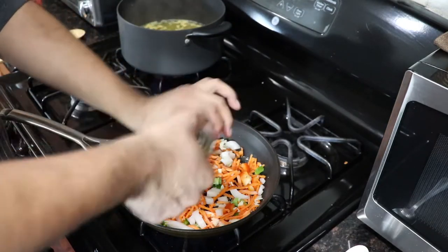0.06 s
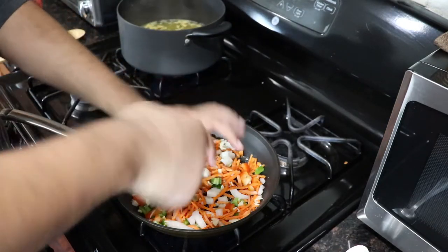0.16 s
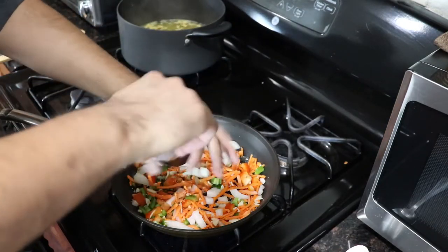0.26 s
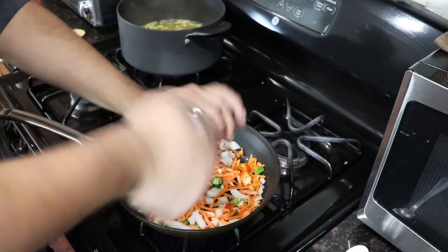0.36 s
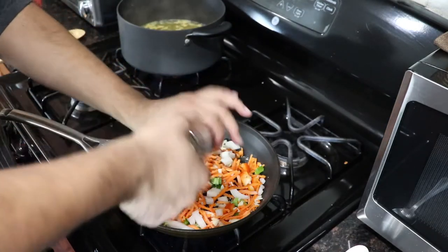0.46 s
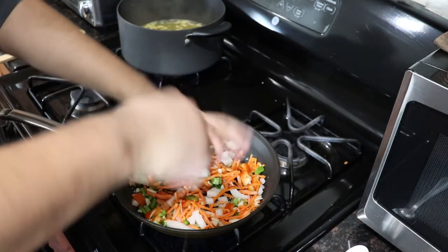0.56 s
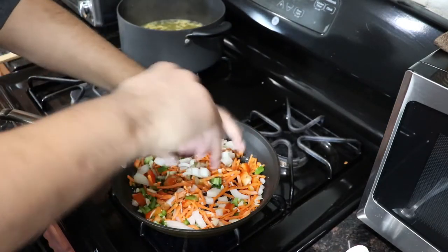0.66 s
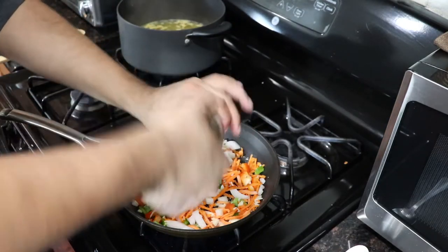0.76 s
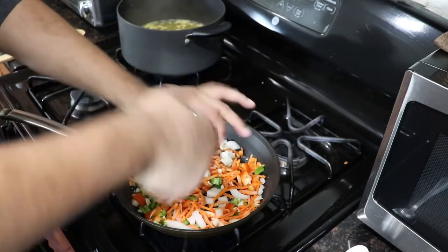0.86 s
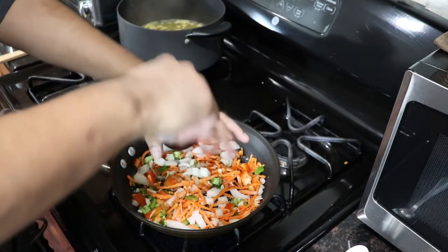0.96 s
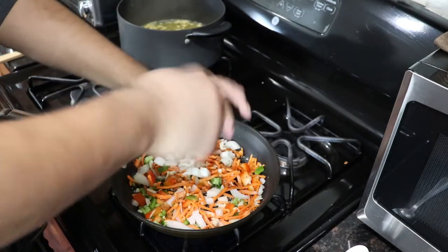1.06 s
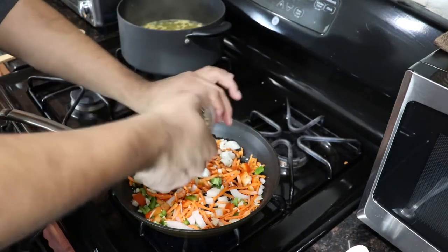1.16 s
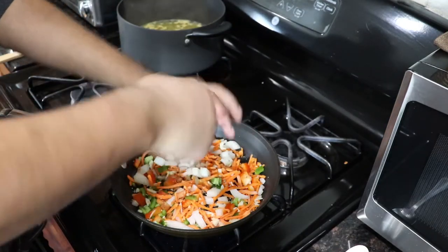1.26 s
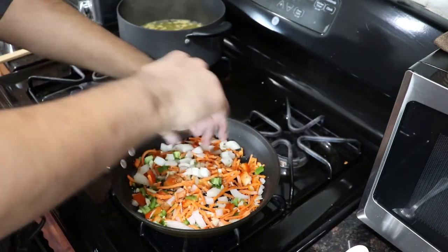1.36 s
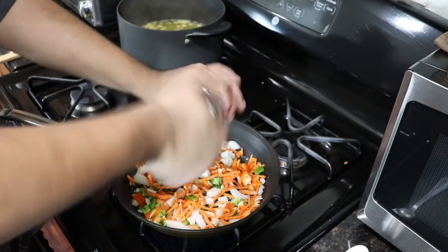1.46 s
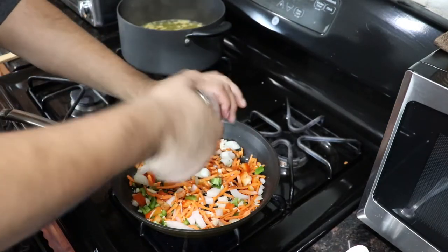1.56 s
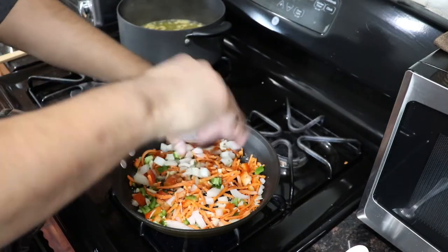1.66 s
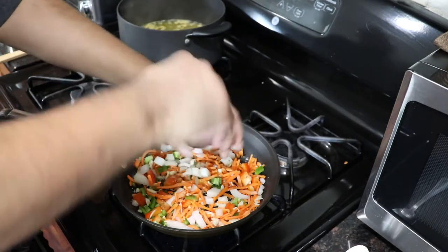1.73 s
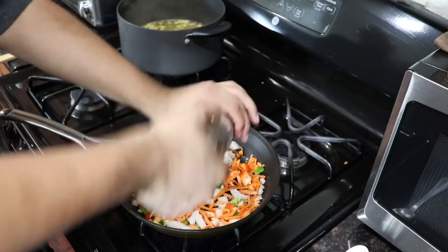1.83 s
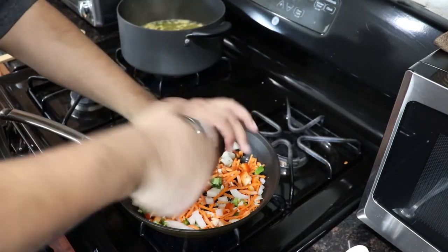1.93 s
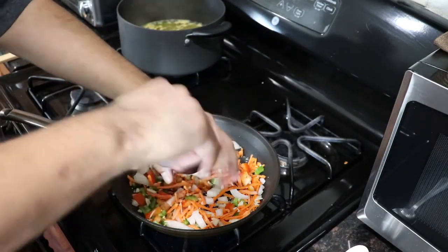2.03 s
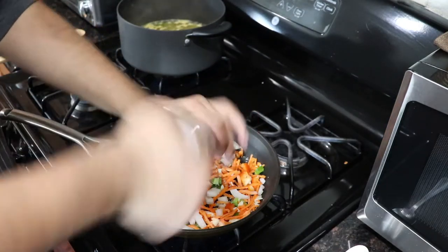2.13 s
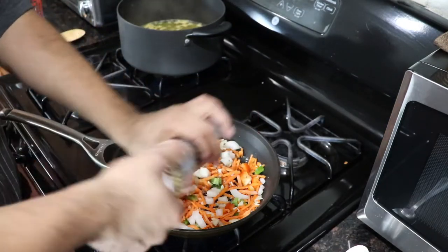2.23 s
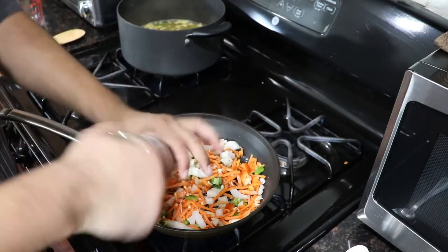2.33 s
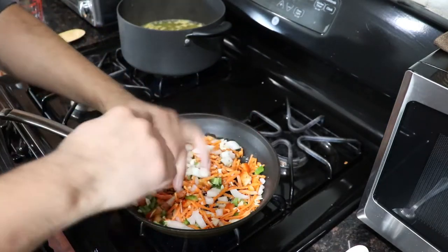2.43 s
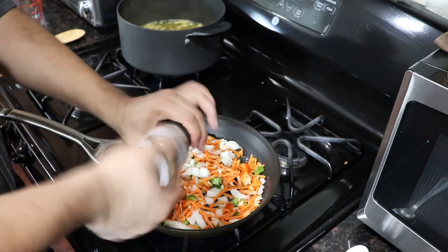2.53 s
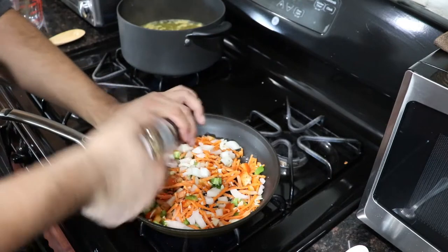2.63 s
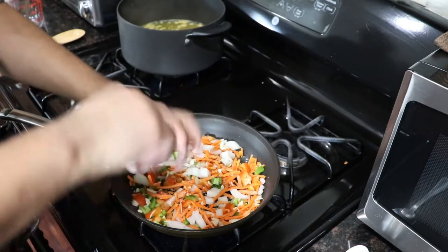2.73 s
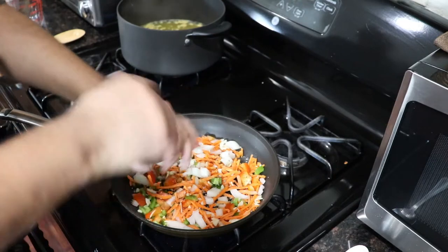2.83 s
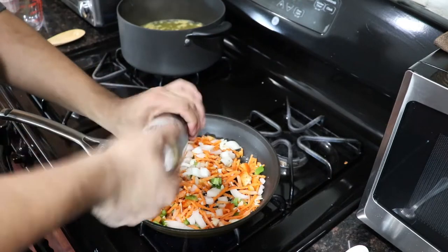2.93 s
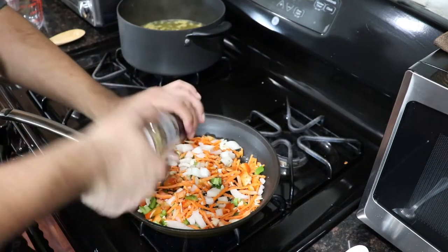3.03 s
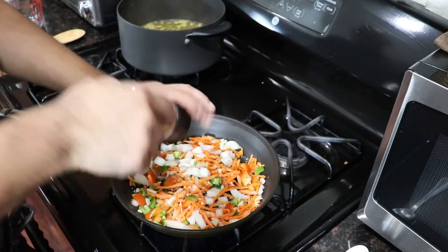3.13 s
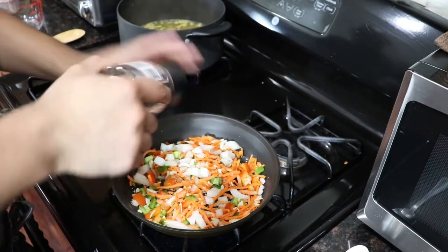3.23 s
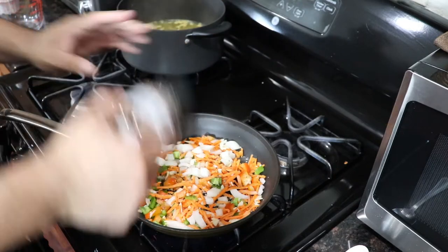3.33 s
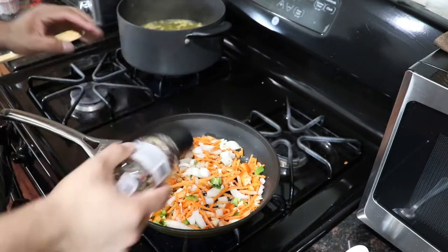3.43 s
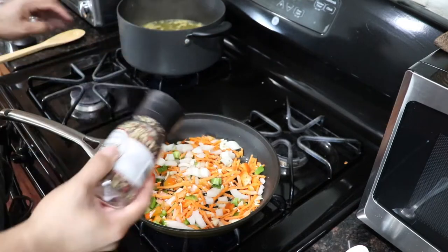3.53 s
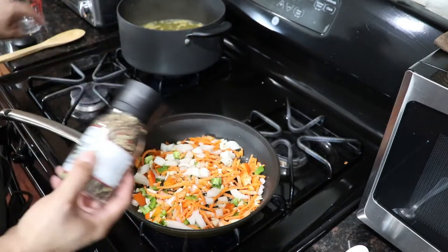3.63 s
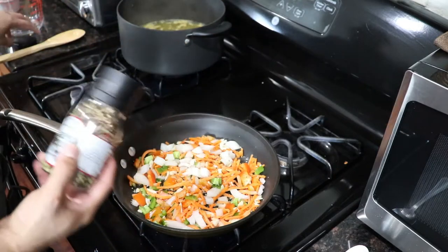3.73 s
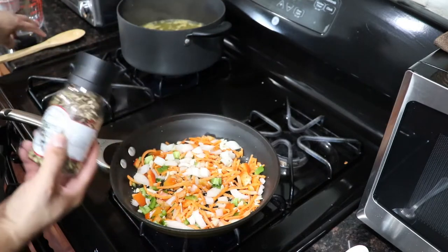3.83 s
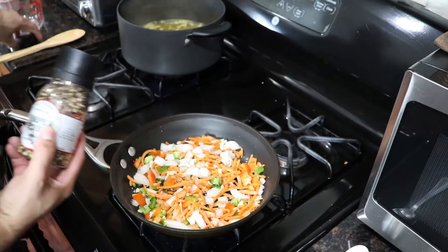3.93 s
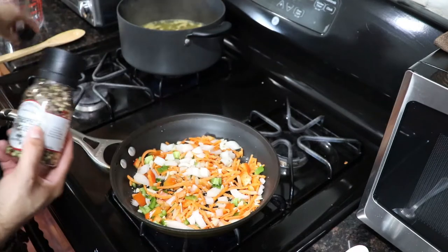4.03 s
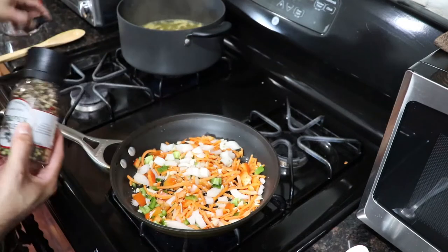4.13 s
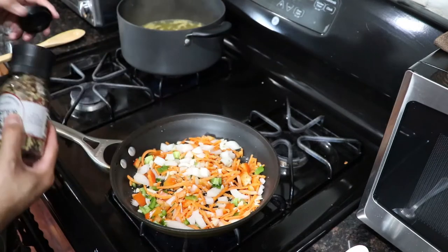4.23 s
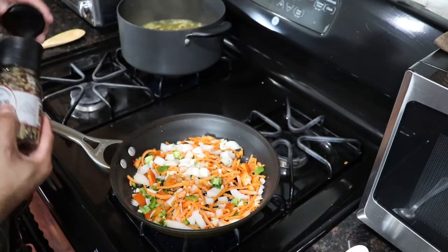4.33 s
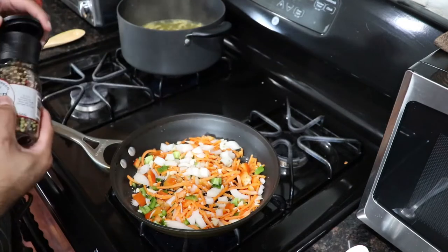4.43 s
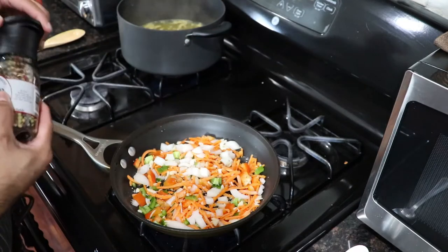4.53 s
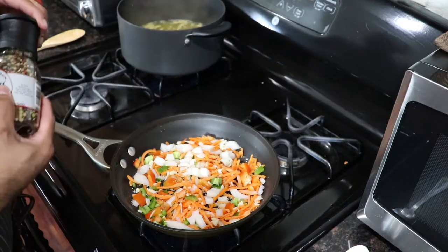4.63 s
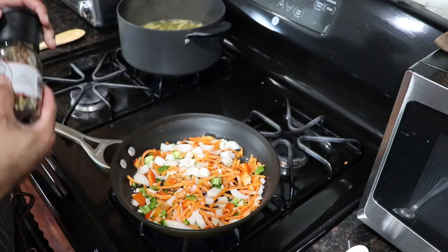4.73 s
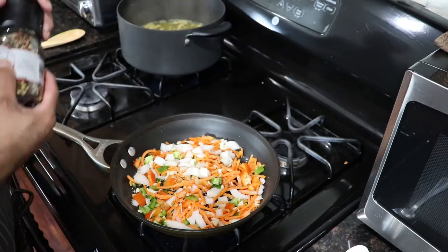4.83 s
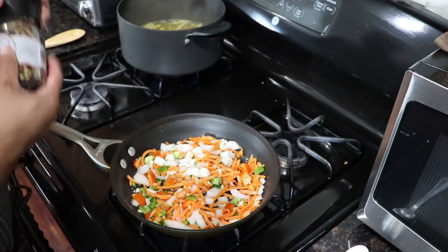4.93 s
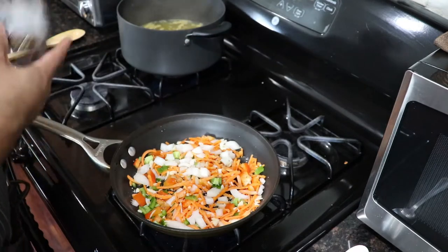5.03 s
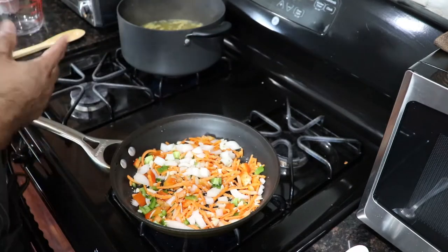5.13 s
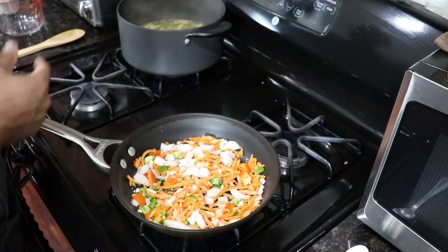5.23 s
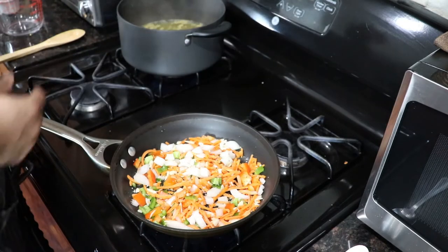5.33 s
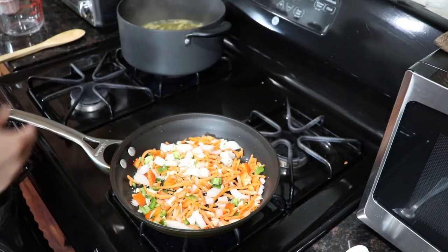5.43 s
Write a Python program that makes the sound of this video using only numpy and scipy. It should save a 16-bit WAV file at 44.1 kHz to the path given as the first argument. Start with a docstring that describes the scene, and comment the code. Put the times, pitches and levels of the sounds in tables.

```python
"""Pepper mill over a sizzling pan

A mill is twisted back and forth: the burr crunches, peppercorns crack, skin rubs on the cap. The mill is
then tipped upright and carried off; knocks on the counter and a brief jar chatter follow.
Crunch, rub, sizzle and patter are filtered random grains; cracks and knocks are decaying noise bursts.
Flame noise and hum lie underneath. One close microphone: gain control ducks everything on loud treble.
"""
import sys
import numpy as np
from scipy import signal
from scipy.fft import rfft, irfft
from scipy.io import wavfile
from scipy.ndimage import uniform_filter1d, minimum_filter1d

SR = 44100
rng = np.random.default_rng(int(sys.argv[2]) if len(sys.argv) > 2 else 0)


def dump(signal):
    """Clip the signal to [-1, 1] and save it as 16-bit WAV at the path in sys.argv[1]."""
    limited = np.clip(np.atleast_2d(signal).T, -1, 1)
    pcm = np.round(limited * 32767).astype(np.int16)
    wavfile.write(sys.argv[1], SR, pcm)


N = 242064

# All levels in dB are relative. Broad spectra are scaled to unit power gain when used.
# Pan, broad spectrum. Each row: frequency in Hz, level in dB.
PAN_SPECTRUM = [(240, -35.5), (400, -11.5), (459, -9), (543, -5.5), (633, -9), (847, -6.5), (1070, -7),
                (1540, -4), (1660, -4.5), (1760, -6), (3250, -4), (3740, -5), (5910, -7), (15500, -24.5)]
# Pan, peaks and a dip. Each row: centre in Hz, width in Hz, height in dB.
PAN_MODES = [(1910, 300, 4), (2920, 230, 2), (7700, 2700, 5.5), (10340, 650, -0.5), (12400, 1800, 7.5)]
# Gas flame, broad spectrum. Each row: frequency in Hz, level in dB.
FLAME_SPECTRUM = [(20, -26), (30, 6), (42, 3), (52, 0), (100, -1.5), (170, -1), (290, 3), (420, -3),
                  (700, -18.5), (2000, -15.5)]
# Hum of stove and kitchen appliances. Each row: frequency in Hz, rms level in dB.
HUM_TONES = [(41, -72), (120, -57.5), (326, -51.5), (603, -53)]
# Skin slides over the mill for a new grip or to let go.
# Each row: start in seconds, rise in seconds, hold in seconds, level in dB, sharpness in dB.
SLIDES = [(0.0, 0.0036, .02, -20, -1), (0.194, 0.17, 0.021, -21, -2), (0.71, 0.033, 0.014, -20.5, 0),
          (1.086, 0.014, .02, -21.5, 0), (1.44, .03, .02, -25, 5.5), (2.149, .012, 0.016, -20.5, -6),
          (2.747, .035, 0.013, -18, -4), (3.194, 0.015, .008, -20.5, 4), (3.446, .025, 0.01, -9.5, -2),
          (3.735, 0.024, .01, -23.5, 3), (5.102, .022, 0.046, -21, 2)]
# Skin on the cap, broad spectrum. Each row: frequency in Hz, level in dB.
SKIN_SPECTRUM = [(100, -33), (300, -26), (800, -19.5), (2000, -7.5), (4000, 2), (5000, -4.5), (6200, 2.5),
                 (7600, 3), (9700, -8.5), (12500, -19), (16000, -32)]
# Working twists of the cap, nearly three a second.
# Each row: start in seconds, rise in seconds, hold in seconds, crunch in dB, rub in dB, rub sharpness in dB.
TWISTS = [(0.039, 0.044, 0.04, -11.5, -20, -8), (0.386, 0.062, 0.024, -12, -19.5, 0),
          (0.765, 0.037, 0.039, -13, -17.5, 2.5), (1.123, 0.052, 0.023, -7.5, -18.5, 6),
          (1.475, 0.044, 0.053, -13, -19, 0), (1.819, 0.058, .015, -13, -16.5, -9),
          (2.169, 0.028, 0.059, -14.5, -19.5, -4), (2.548, 0.062, 0.017, -14, -13, 0),
          (2.909, 0.069, 0.033, -14, -16, 3)]
# Lighter turns back between the twists.
# Each row: start in seconds, rise in seconds, hold in seconds, crunch in dB, rub in dB, rub sharpness in dB.
BACK_TURNS = [(0.607, 0.039, 0.026, -26, -20, -9), (0.958, 0.03, 0.014, -25.5, -22, -4),
              (1.314, 0.022, 0.036, -23.5, -26.5, -2), (1.67, 0.034, .04, -29.5, -26.5, -3),
              (2.031, 0.016, 0.014, -23, -23, -13), (2.4, .04, 0.033, -29, -19.5, 0.5),
              (2.734, 0.084, 0.034, -20, -23.5, -2), (3.144, .008, 0.0074, -30.5, -40, 1)]
# Whole peppercorns breaking in the burr.
# Each row: start in seconds, level in dB, treble gain in dB, t60 in seconds.
CRACKS = [(0.05, -14.5, 17, 0.0089), (0.064, -11, 5, 0.034), (0.1, 5.5, 4.5, 0.012), (0.145, 0.5, 7, 0.013),
          (0.451, -1, 7.5, 0.015), (0.4703, -2, 1, 0.018), (0.4878, -12.5, 23.5, 0.008),
          (0.6071, -8, -20, 0.035), (0.6306, -2, 2.5, 0.013), (0.7976, -4, -0.5, 0.021),
          (0.804, -9, -4, 0.017), (0.8785, -19, 18.5, 0.012), (1.029, -28, 16, 0.0095),
          (1.1557, -1, 16.5, 0.041), (1.195, 5, -2.0, 0.019), (1.207, 10, -1, 0.0095),
          (1.3569, -10.5, 8.5, 0.011), (1.5006, -11, -14, 0.014), (1.5242, 10, -2.5, 0.0085),
          (1.5505, -6, -10, 0.02), (1.568, -1, 10, 0.0085), (1.8497, -4.5, 3, 0.017),
          (1.8562, -3.5, 4, 0.041), (1.8763, -1.5, -7, 0.029), (1.8808, 0, 9.5, 0.026),
          (1.953, -16.5, 25, 0.0092), (2.0424, -12.5, -22, 0.041), (2.1943, 0, 5.5, 0.048),
          (2.2204, 3, -8, 0.028), (2.259, 1, 7.5, 0.02), (2.2693, 0.5, 18, 0.0063), (2.617, 7, -4, 0.028),
          (2.7965, -15.5, 11.5, 0.018), (2.829, -3.5, -15, 0.022), (2.8317, 0, -0.5, 0.016),
          (2.937, -10.5, 1, 0.022), (2.974, -2.5, 6, 0.0083), (2.9942, 3, 4, 0.013), (3.157, -16, 0, 0.036)]
# Mill body, broad spectrum. Each row: frequency in Hz, level in dB.
MILL_SPECTRUM = [(60, -35), (150, -40), (240, -7.5), (450, -12), (750, -12), (950, -1.5), (1400, -4.5),
                 (2600, -4.5), (4200, -7), (5200, -7), (7800, -6), (9500, -17.5), (13000, -17),
                 (16000, -59)]
# Resonances of cap and jar before detuning. Each row: centre in Hz, width in Hz, height in dB.
MILL_MODES = [(284, 250, 5.5), (1065, 127, 9.5), (1809, 200, 9.5), (2730, 1060, 5), (3200, 460, 4.5),
              (4084, 420, 6), (7200, 670, 6)]
# Loosened grit, broad spectrum. Each row: frequency in Hz, level in dB.
GRIT_SPECTRUM = [(900, -38), (2400, -15), (3000, -1), (3800, -1), (4500, -8), (8000, -18), (12000, -56)]
# Peppercorns tumble as the jar is tipped, then stood upright.
# Each row: start in seconds, rise in seconds, hold in seconds, level in dB.
TUMBLES = [(3.36, 0.083, 0.034, -21.5), (3.693, .065, 0.035, -25)]
# Jar wall, broad spectrum. Each row: frequency in Hz, level in dB.
WALL_SPECTRUM = [(200, -23), (750, -11), (1100, 0.5), (1900, 1.5), (3500, -2.5), (7500, 3.5), (14000, -30)]
# Jar resonances around loose peppercorns.
# Each row: centre in Hz, width in Hz, height tipped in dB, height upright in dB.
JAR_MODES = [(1090, 140, 17, 0), (1380, 140, 3, 6.5), (1730, 220, 9.5, 12), (2960, 500, 11, 8)]
# Dull knocks, first in the mill, later on the counter.
# Each row: start in seconds, level in dB, lowest in Hz, highest in Hz, t60 in seconds.
KNOCKS = [(1.1579, -16.5, 45, 195, 0.026), (4.493, -27.5, 700, 1600, 0.023),
          (4.5248, -16.5, 690, 1850, 0.02), (4.605, -21.5, 280, 2000, 0.04), (4.652, -21, 280, 1700, 0.016),
          (4.692, -15.5, 452, 2080, 0.03), (4.839, -22.5, 400, 1140, 0.018),
          (4.8797, -13.5, 130, 1550, 0.021), (4.887, -17.5, 170, 1500, 0.02)]
# A jar chatters against its neighbour.
# Each row: start in seconds, rise in seconds, hold in seconds, level in dB.
CLINKS = [(4.59, 0.0085, 0.012, -24)]
# Chattering jar, broad spectrum. Each row: frequency in Hz, level in dB.
CLINK_SPECTRUM = [(500, -18), (1800, 0), (3500, -13), (7000, -12), (14000, -22)]
# Chattering jar, resonances. Each row: centre in Hz, width in Hz, height in dB.
CLINK_MODES = [(1820, 180, 9), (2200, 200, 9), (2630, 320, 11), (4960, 200, 22)]

# Fall of each movement after its hold
TWIST_RELEASE_DB_PER_S, BACK_RELEASE_DB_PER_S = 182, 167
RUB_RELEASE_DB_PER_S, SLIDE_RELEASE_DB_PER_S, TUMBLE_RELEASE_DB_PER_S = 223, 217, 196
RUB_LAG_S = 0.027  # in a working twist the rub follows the bite of the burr


def from_db(db):
    """Decibels to amplitude gain."""
    return 10 ** (np.asarray(db) / 20)


def rms_one(x):
    """Scale to unit power."""
    return x / np.sqrt(np.mean(x ** 2) + 1e-20)


def drift(rate_hz):
    """Slow random signal of unit power: low-passed noise made at SR / 40, then interpolated."""
    r = np.exp(-80 * np.pi * rate_hz / SR)
    noise = rng.standard_normal(N // 40 + 2002)
    slow = signal.lfilter([1], [1, -2 * r, r * r], noise)[2000:]  # drop the start-up
    return np.interp(np.arange(N) / 40, np.arange(len(slow)), rms_one(slow))


def butter(x, hz, kind, order=2):
    """Causal Butterworth filter."""
    sos = signal.butter(order, np.clip(hz, 10, .45 * SR), kind, fs=SR, output="sos")
    return signal.sosfilt(sos, x)


def colour(x, spectrum, modes=(), size=8192):
    """Pass x through a causal body of unit power gain: a broad spectrum plus resonances."""
    hz = np.maximum(np.fft.rfftfreq(size, 1 / SR), 1)
    points_hz, points_db = np.transpose(spectrum)
    level_db = np.interp(np.log(hz), np.log(points_hz), points_db)
    for centre_hz, width_hz, height_db in modes:
        level_db = level_db + height_db / (1 + (2 * (hz - centre_hz) / width_hz) ** 2)
    # minimum phase by folding the cepstrum: nothing rings before the blow
    cepstrum = irfft(np.log(from_db(level_db)))
    cepstrum[1:size // 2] *= 2
    cepstrum[size // 2 + 1:] = 0
    response = irfft(np.exp(rfft(cepstrum)))
    return signal.fftconvolve(x, response / np.linalg.norm(response))[:N]


def grains(per_s, spread_db):
    """Random clicks of uneven size and sign, unit power."""
    sizes = from_db(spread_db * np.minimum(rng.exponential(1, N), 4))
    signed = sizes * rng.choice([-1, 1], N)
    return rms_one(signed * (rng.random(N) < per_s / SR))


def burst(t60_s, size=4096):
    """Noise that starts at unit power and decays exponentially."""
    decay = from_db(-60 * np.arange(size) / (SR * max(t60_s, .002)))
    return rng.standard_normal(size) * decay


def add(track, start_s, sound):
    """Mix a sound into the track."""
    at = max(round(start_s * SR), 0)
    track[at:at + len(sound)] += sound[:N - at]


def swell(start_s, rise_s, hold_s, release_db_per_s):
    """Strength of one movement: a linear rise, a hold, a steady fall in dB."""
    t = np.arange(N) / SR - start_s
    rise_s = max(rise_s, .002)
    fall_s = np.clip(t - rise_s - hold_s, 0, 1)
    return np.clip(t / rise_s, 0, 1) * from_db(-release_db_per_s * fall_s)


def sizzle(hiss_db=-28.0, spit_db=-39.0):
    """Steam bubbles burst in the oil as dense grains; the smallest spit sharply above the hiss."""
    bubbles = grains(per_s=14000, spread_db=2.0)
    hiss = from_db(hiss_db + 0.98 * drift(10)) * colour(bubbles, PAN_SPECTRUM, PAN_MODES)
    spits = butter(grains(per_s=1100, spread_db=3.6), 7000, "high")
    return hiss + from_db(spit_db) * spits


def stove(flame_db=-42.0, waver_rad=0.46):
    """Gas flame as soft filtered noise, plus hum tones whose phases waver."""
    t = np.arange(N) / SR
    hum = np.zeros(N)
    for hz, rms_db in HUM_TONES:
        phase = 2 * np.pi * hz * t + waver_rad * drift(12)
        hum += np.sqrt(2) * from_db(rms_db) * np.sin(phase)
    return from_db(flame_db) * colour(rng.standard_normal(N), FLAME_SPECTRUM) + hum


def rubbing():
    """Strength of the friction and of its sharp edge: the strongest turn or slide at each instant."""
    rubs = []
    for s, rise, hold, _, db, sharp_db in TWISTS:
        rubs.append((swell(s + RUB_LAG_S, rise, hold, RUB_RELEASE_DB_PER_S), db, sharp_db))
    for s, rise, hold, _, db, sharp_db in BACK_TURNS:
        rubs.append((swell(s, rise, hold, BACK_RELEASE_DB_PER_S), db, sharp_db))
    for s, rise, hold, db, sharp_db in SLIDES:
        rubs.append((swell(s, rise, hold, SLIDE_RELEASE_DB_PER_S), db, sharp_db))
    strength = np.max([shape * from_db(db) for shape, db, _ in rubs], axis=0)
    sharp_strength = np.max([shape * from_db(db + sharp_db) for shape, db, sharp_db in rubs], axis=0)
    return strength, sharp_strength


def hand(edge_hz=10500, rasp_db=-2.5, tick_db=-9):
    """Cap and dry skin stick and slip in very fine grains; sharper slips add a crisp, ticking edge."""
    strength, sharp_strength = rubbing()
    friction = grains(per_s=14000, spread_db=5.0)
    stick_slip = rms_one(from_db(2.75 * drift(190)))
    rasp = from_db(rasp_db) * colour(friction * stick_slip, SKIN_SPECTRUM)
    ticks = from_db(tick_db) * grains(per_s=350, spread_db=2.5)
    edge = butter(rasp + butter(ticks, 13200, "low"), edge_hz, "high", order=3)
    return strength * butter(rasp, edge_hz, "low", order=3) + sharp_strength * edge


def burr_effort():
    """How hard the burr chews: the strongest twist or back turn at each instant."""
    efforts = []
    for turns, release in [(TWISTS, TWIST_RELEASE_DB_PER_S), (BACK_TURNS, BACK_RELEASE_DB_PER_S)]:
        for s, rise, hold, crunch_db, _, _ in turns:
            efforts.append(from_db(crunch_db) * swell(s, rise, hold, release))
    return np.max(efforts, axis=0)


def cracks(snap_hz=5000, level_db=1.5, build_s=0.00055):
    """Each fracture is a brief shower of splinters; brittle ones carry more treble."""
    track = np.zeros(N)
    build = 1 - np.exp(-np.arange(4096) / (SR * build_s))
    for s, db, bright_db, t60_s in CRACKS:
        shower = burst(t60_s) * build
        dull = butter(shower, snap_hz, "low", order=1)
        treble = shower - dull
        add(track, s, from_db(db + level_db) * (dull + from_db(bright_db) * treble))
    return butter(track, 10500, "low", order=1)


def splinters(per_s=130, t60_s=0.0085):
    """Lesser fractures at random, each a short shower of noise; unit power."""
    decay = from_db(-60 * np.arange(2048) / (SR * t60_s))
    breaks = np.abs(grains(per_s, spread_db=2.0))
    return rms_one(signal.fftconvolve(breaks, decay)[:N] * rng.standard_normal(N))


def wandering_body(x, spectrum, modes, shift=0.03, rate_hz=2.6):
    """The grip detunes the mill: its resonances wander between a slack and a tight tuning."""
    grip = np.pi / 2 * np.tanh(drift(rate_hz))
    slack, neutral, tight = [
        colour(x, spectrum, [(hz * (1 + side * shift), width, db) for hz, width, db in modes])
        for side in (-1, 0, 1)]
    away = np.sin(grip) ** 2
    return (1 - away) * neutral + away * np.where(grip < 0, slack, tight)


def mill(effort_db=-2.5, splinter_db=-7.5, spill_db=13.0, grit_db=-11.5, grit_lag_s=0.049, crunch_hz=5400):
    """Small crunches and big cracks ring the same cap and jar; loosened grit trickles out after each stroke."""
    effort = from_db(effort_db) * burr_effort()
    # the burr grips and slips, crushing a few coarse fragments at a time
    catching = rms_one(from_db(2.2 * drift(130)))
    fragments = grains(per_s=1500, spread_db=2.4)
    crunch = butter(effort * catching * fragments, crunch_hz, "low")
    crunch = crunch + from_db(splinter_db) * effort * splinters()
    breaking = cracks()
    # a broken peppercorn spills more grit, up to a limit
    loosened = effort + from_db(spill_db) * np.tanh(np.abs(breaking))
    r = np.exp(-1 / (grit_lag_s * SR))
    flow = signal.lfilter([1 - r], [1, -r], loosened)
    trickle = flow * grains(per_s=2700, spread_db=-1.5)
    grit = from_db(grit_db) * colour(trickle, GRIT_SPECTRUM)
    return wandering_body(crunch + breaking, MILL_SPECTRUM, MILL_MODES) + grit


def shaking(jolt_db=-8):
    """How hard the loose peppercorns move: tipping the jar, and the jolt of each back turn."""
    tipping = sum(from_db(db) * swell(s, rise, hold, TUMBLE_RELEASE_DB_PER_S)
                  for s, rise, hold, db in TUMBLES)
    jolts = sum(from_db(db) * swell(s, rise, hold, TUMBLE_RELEASE_DB_PER_S)
                for s, rise, hold, db, _, _ in BACK_TURNS)
    return tipping + from_db(jolt_db) * jolts


def tumble():
    """Loose peppercorns patter against the jar and damp its lowest resonance as they settle."""
    patter = shaking() * grains(per_s=2200, spread_db=4.0)
    tipped = colour(patter, WALL_SPECTRUM, [(hz, width, db) for hz, width, db, _ in JAR_MODES])
    settled = colour(patter, WALL_SPECTRUM, [(hz, width, db) for hz, width, _, db in JAR_MODES])
    upright = np.interp(np.arange(N) / SR, [3.52, 3.7], [0, 1])
    return (1 - upright) * tipped + upright * settled


def knocks(level_db=2.5, tick_db=-15, scatter=0.68):
    """A blow and its brief chatter, in a band set by what is hit and how softly, with a faint tick on top."""
    track = np.zeros(N)
    for s, db, low_hz, high_hz, t60_s in KNOCKS:
        contact = scatter * burst(t60_s)
        contact[0] += np.linalg.norm(contact)  # the first touch holds about half of the energy
        band_gain = np.sqrt(SR / 2 / max(high_hz - low_hz, 100))  # offsets the power lost in the filter
        thud = butter(contact, [low_hz, high_hz], "band") * band_gain
        tick = from_db(tick_db) * butter(contact, 4000, "low")
        add(track, s, from_db(db + level_db) * (thud + tick))
    return track


def clink(release_db_per_s=900):
    """A short run of light touches sets a jar ringing."""
    strength = sum(from_db(db) * swell(s, rise, hold, release_db_per_s) for s, rise, hold, db in CLINKS)
    touches = strength * grains(per_s=1500, spread_db=2.5)
    return colour(touches, CLINK_SPECTRUM, CLINK_MODES)


def kitchen(x, near_db=-10, room_db=-13, wall_hz=5500, room_t60_s=0.19):
    """Quick reflections off the stove top and a short, duller room tail, by noise convolution."""
    near = burst(0.026)
    tail = butter(burst(room_t60_s, size=16384), wall_hz, "low")
    response = np.zeros(N)
    add(response, .002, from_db(near_db) * near / np.linalg.norm(near))
    add(response, .008, from_db(room_db) * tail / np.linalg.norm(tail))
    return x + signal.fftconvolve(x, response[:SR // 2])[:N]


def scene():
    """Sum to one microphone, in two equal channels; sizzle and stove bypass the reflections."""
    handled = mill() + tumble() + hand() + knocks() + clink()
    mono = kitchen(handled) + sizzle() + stove()
    return np.array([mono, mono])


def gain_control(x, threshold_db=-20.0, slope=0.56, release_db_per_s=85, attack_s=0.0014,
                 sense_hz=5000, hold_samples=1200):
    """Loud treble pulls the whole gain down; it holds a moment and creeps back."""
    treble = butter(x, sense_hz, "high")
    level_db = 10 * np.log10(np.maximum(uniform_filter1d(treble ** 2, size=88), 1e-12))
    # running maximum over the past
    held_db = -minimum_filter1d(-level_db, size=hold_samples, origin=(hold_samples - 1) // 2)
    wanted_cut_db = slope * np.maximum(held_db - threshold_db, 0)
    # the ramp limits how fast the cut may shrink
    ramp_db = release_db_per_s * np.arange(N) / SR
    cut_db = np.maximum.accumulate(wanted_cut_db + ramp_db) - ramp_db
    r = np.exp(-1 / (attack_s * SR))
    return from_db(-signal.lfilter([1 - r], [1, -r], cut_db))


def record(dry, cutoff_hz=16000):
    """Gain control, overload clipping of the peaks, and a steep top cut."""
    loud = np.clip(dry * gain_control(dry[0]), -.95, .95)
    top_cut = signal.ellip(10, .1, 70, cutoff_hz, fs=SR, output="sos")
    return signal.sosfilt(top_cut, loud)


dry = scene()
out = record(dry)
dump(out)
```